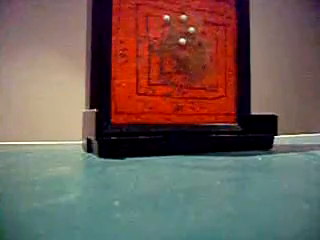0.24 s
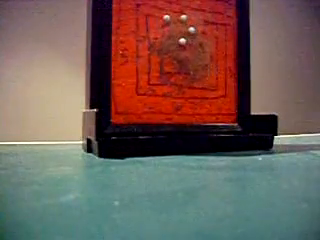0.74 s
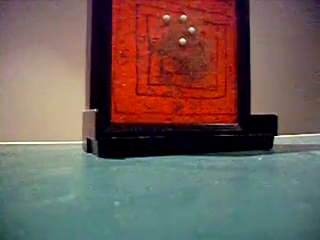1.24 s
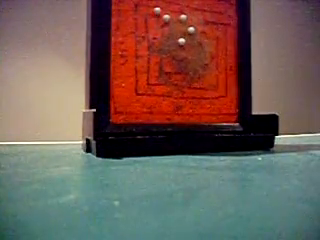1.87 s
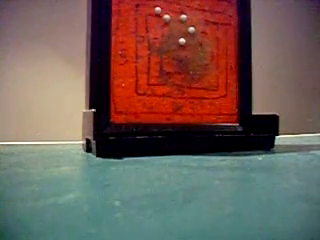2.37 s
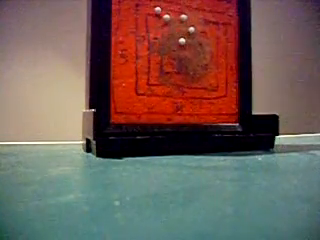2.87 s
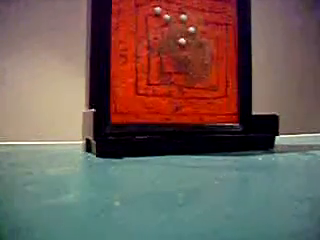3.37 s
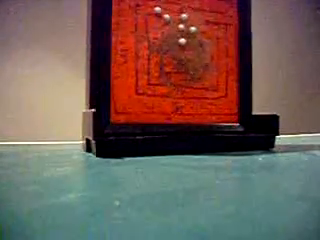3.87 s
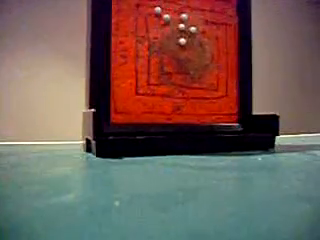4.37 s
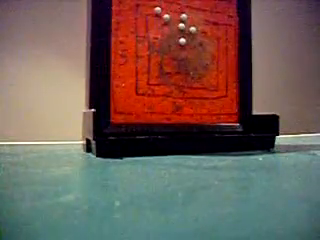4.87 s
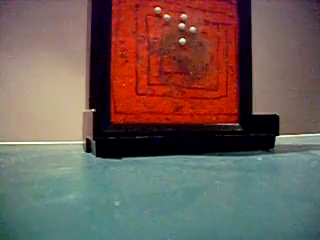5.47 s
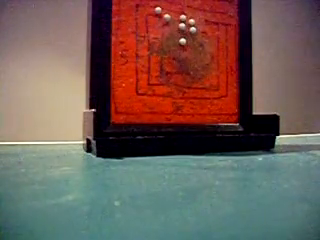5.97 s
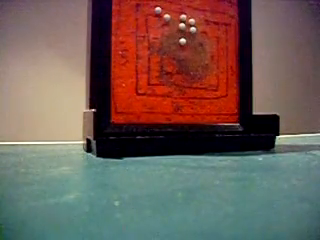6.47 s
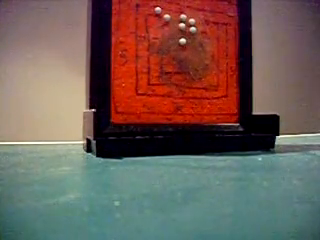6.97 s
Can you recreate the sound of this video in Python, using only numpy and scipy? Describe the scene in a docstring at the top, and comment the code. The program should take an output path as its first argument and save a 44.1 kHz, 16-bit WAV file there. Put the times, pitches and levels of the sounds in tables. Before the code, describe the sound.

Four loud airsoft snaps with pellets smacking plastic indoors, each followed by the clicks and clack of the slide being cocked.

```python
"""Airsoft target practice in a hard room

A spring airsoft pistol fires four times at a sticky plastic target close to the microphone. Each shot
is a piston slam, the pellet's smack on the drumming panel, then a dull thud. The slide is racked back
with small clicks and scrapes, and snaps home. The loud blows overload the microphone stage."""
import sys
import numpy as np
from scipy import signal
from scipy.fft import rfft, irfft
from scipy.io import wavfile
from scipy.ndimage import uniform_filter1d

SR = 44100
rng = np.random.default_rng(int(sys.argv[2]) if len(sys.argv) > 2 else 0)


def digitize_waveform(pressure):
    """Quantize a signal to 16-bit integers and store it at the path in sys.argv[1].

    Rows of a 2-D input are taken as channels; values are limited to [-1, 1].
    """
    field = np.atleast_2d(pressure).T
    bounded = np.clip(field, -1, 1)
    quanta = np.round(bounded * 32767).astype(np.int16)
    wavfile.write(sys.argv[1], SR, quanta)


N = 318402

# Piston slams. Each row: start in seconds, level in dB, crack in dB, wait for the thud in seconds.
SHOTS = [(0.0321, 1, -25, .1097), (2.0662, 0.5, -6.5, 0.11), (4.0226, 1, -5.5, .1068),
         (5.9307, -1.5, -5, 0.11)]
# The slide snapping home. Each row: impact time in seconds, level in dB, spring ring in dB,
# travel time since letting go in seconds, click of letting go in dB.
SLIDE_SNAPS = [(0.8585, -3.5, -42, 0.017, -6.5), (2.8530, -2.5, -52, 0.011, -2.5),
               (4.8388, -5.5, -37, 0.018, 1.5), (6.746, -3.5, -39, .0155, 1)]
# Tone of a smack on plastic, a bright tick and a knock on the pistol's body.
# Each row: frequency in Hz, relative level in dB.
SMACK_TONE = [(25, -12), (200, -3.5), (310, -6), (520, 4.5), (680, 3), (950, 7), (1270, -7), (1700, 4),
              (2500, -10.5), (3400, -1.5), (5000, -18), (7400, -31)]
TICK_TONE = [(200, -14), (1200, -23), (2000, -5.5), (2800, -6), (3200, 2.5), (3900, -3), (4900, -2),
             (5700, -0.5), (6050, 3.5), (6300, 0), (6650, 5.5), (7200, -8.5), (7500, 5)]
KNOCK_TONE = [(100, -23), (500, -9), (1000, -7), (1350, -15.5), (1600, 4.5), (1900, 5.5), (2200, -11),
              (2600, -2), (4000, -31), (7500, -36)]
# Modes of the pistol's shell. Each row: frequency in Hz, level in dB, time to fade 60 dB in seconds.
SHELL_MODES = [(1587, -7, 0.066), (1774, -1, .05), (1922, 1.5, 0.048), (2290, 2, .045), (3250, -4, 0.12),
               (6000, 1.5, 0.036), (6720, 5.5, 0.025)]


def amp(db):
    """Decibels to gain."""
    return 10 ** (np.asarray(db) / 20)


def unit_rms(x):
    """Scales a signal to an rms of 1."""
    return x / np.sqrt(np.mean(x ** 2) + 1e-20)


def curve_at(points, hz):
    """Joins table points on a log-frequency axis."""
    freqs, values = np.transpose(points)
    return np.interp(np.log(hz + 1), np.log(freqs + 1), values)


def add(mix, start_s, sound):
    """Mixes a sound in at its start time."""
    start = round(start_s * SR)
    sound = sound[max(-start, 0):]
    part = mix[max(start, 0):][:len(sound)]
    part += sound[:len(part)]


def colour(x, tone, size=4096):
    """Minimum-phase EQ with extra roll-off above 8 kHz; white noise keeps its power."""
    hz = abs(np.fft.fftfreq(size, 1 / SR))
    rolloff_db = 20 * np.clip(hz / 8000 - 1, 0, 2)
    log_gain = np.log(amp(curve_at(tone, hz) - rolloff_db))
    taps = np.fft.ifft(np.exp(np.conj(signal.hilbert(log_gain)))).real
    return signal.oaconvolve(x, taps / np.linalg.norm(taps))[:N]


def chatter(envelope):
    """Dense micro-impacts under an envelope, about equally strong at every frequency."""
    x = envelope * rng.standard_normal(len(envelope))
    for _ in range(3):
        white = irfft(np.exp(1j * np.angle(rfft(x))), len(x))
        local_rms = np.sqrt(abs(uniform_filter1d(white ** 2, 64)) + 1e-18)
        x = envelope * white / local_rms
    return x


def blows(rows, decay_s, lead_s, lead_db):
    """Each blow (seconds, dB) swells as the parts slide together, strikes and dies away."""
    out, t = np.zeros(N), np.arange(4096) / SR
    run_up = amp(lead_db) * np.maximum(1 - t[::-1] / lead_s, 0) ** 2
    for start, db in rows:
        add(out, start - t[-1], amp(db) * run_up * rng.standard_normal(len(t)))
        add(out, start, amp(db) * chatter(np.exp(-t / decay_s)))
    return out


def ring(rows, modes, detune=0.0056):
    """Each blow (seconds, dB) sets the same damped modes going, slightly detuned by where it lands."""
    out, t = np.zeros(N), np.arange(SR // 2) / SR
    for start, blow_db in rows:
        for hz, db, t60 in modes:
            cycles = hz * (1 + detune * (2 * rng.random() - 1)) * t + rng.random()
            add(out, start, amp(blow_db + db - 60 * t / t60) * np.sin(2 * np.pi * cycles))
    return out


def room_tail(build_s=0.0086, mixing_s=0.11):
    """Separate echoes crowd into a wash; each band dies at its own speed."""
    # Room decay. Each row: frequency in Hz, time to fade 60 dB in seconds.
    reverb_times = [(60, 0.38), (170, 0.48), (450, 0.47), (1000, 0.47), (1800, 0.52), (2600, 0.41),
                    (3400, 0.56), (5000, 0.46), (7500, 0.36)]
    age = np.arange(SR) / SR
    density = np.clip((age / mixing_s) ** 2, 0.03, 1) / 10  # echoes per sample
    arrivals = np.diff(np.floor(np.cumsum(density * 2 * rng.random(SR))), prepend=0)
    echoes = arrivals * rng.choice([-1., 1.], SR) / np.sqrt(density)
    hz, t, bands = signal.stft(echoes, SR, nperseg=256)
    fade = amp(-60 * t / curve_at(reverb_times, hz)[:, None])
    tail = signal.istft(bands * fade, SR, nperseg=256)[1][:SR]
    tail *= 1 - np.exp(-(age / build_s) ** 2)
    return tail / np.linalg.norm(tail)


def in_room(x, early, wet_db):
    """Direct sound, early reflections and the tail for one spot in the room."""
    # Bounces off near surfaces. Each row: delay in seconds, relative gain.
    reflections = [(.0052, 0.32), (.0098, 0.24), (0.0121, 0.36), (0.0258, 0.26), (0.032, 0.3),
                   (0.0344, 0.14)]
    response = amp(wet_db) * room_tail()
    response[0] += 1
    for delay, gain in reflections:
        add(response, delay, np.array([early * gain]))
    return signal.oaconvolve(x, response)[:N]


def room_tone(level_db=-50.5):
    """A steady bed of room rumble and microphone hiss."""
    # Tone of the bed. Each row: frequency in Hz, relative level in dB.
    bed_tone = [(12, -26), (20, 3), (80, -6), (200, -9.5), (269, -10), (344, -11.5), (705, -15.5),
                (798, -16.5), (1100, -18), (1680, -20.5), (1850, -20), (3350, -23), (7400, -23),
                (9620, -56), (16300, -120)]
    gain = amp(curve_at(bed_tone, np.fft.rfftfreq(N, 1 / SR)))
    return amp(level_db) * unit_rms(irfft(rfft(rng.standard_normal(N)) * gain, N))


def piston_slams():
    """The spring drives the piston into the cylinder head with a crack, and the shell rings."""
    # Tone of the slam. Each row: frequency in Hz, relative level in dB.
    slam_tone = [(25, -7.5), (100, -8), (250, -2), (430, 3), (640, -7), (850, 3.5), (1200, -3.5),
                 (1400, -0.5), (2100, -4.5), (2500, -1), (3500, -4), (4800, -8), (7400, -21.5)]
    shots = np.array(SHOTS)
    slam = colour(blows(shots[:, :2], decay_s=0.0049, lead_s=0.0095, lead_db=-14.5), slam_tone)
    crack = colour(blows(shots[:, [0, 2]], decay_s=0.0039, lead_s=0.00092, lead_db=-19), TICK_TONE)
    shell = amp(-23) * ring(shots[:, :2], SHELL_MODES)
    return in_room(slam + crack + shell, early=0.84, wet_db=-1.5)


def pellet_hits():
    """A pellet cracks onto the panel, which drums (higher near its rim); a hard hit rattles the frame."""
    # Pellets landing. Each row: start in seconds, smack in dB, drum note in dB, its ring-time factor,
    # its pitch factor, frame rattle in dB, crack in dB.
    hits = [(.057, 3, 2, 0.68, 1.04, -31, -4), (2.092, 3.5, -4, 0.59, 1.42, -22.5, -1.5),
            (4.0448, 5, 9, 1.01, 1.04, 0.5, -4.5), (5.956, -17.5, 6, 0.33, 0.945, -40, -16.5)]
    # Drum modes of the panel. Each row: frequency in Hz, level in dB, time to fade 60 dB in seconds.
    panel_modes = [(512.6, -12, 0.069), (620.4, -4.5, 0.084), (681, -2, 0.07), (755.5, -6, 0.099),
                   (840, -10.5, 0.09), (961, -8.5, 0.055), (1660, -29, 0.18)]
    hits = np.array(hits)
    smack = colour(blows(hits[:, :2], decay_s=0.0043, lead_s=0.00161, lead_db=-10), SMACK_TONE)
    crack = colour(blows(hits[:, [0, 6]], decay_s=0.0016, lead_s=0.001, lead_db=-20), TICK_TONE)
    rattle = colour(blows(hits[:, [0, 5]], decay_s=0.022, lead_s=0.002, lead_db=-24), TICK_TONE)
    drum = sum(ring([(start, db)], np.array(panel_modes) * [pitch, 1, stretch])
               for start, _, db, stretch, pitch, _, _ in hits)
    return (in_room(smack + crack, early=0.72, wet_db=-10.5)
            + in_room(drum, early=0.15, wet_db=-8)
            + in_room(rattle, early=0.38, wet_db=-4))


def dull_thuds():
    """After each shot a single low push booms in the room, with a light, dry tick on top."""
    # Tone of the thud. Each row: frequency in Hz, relative level in dB.
    thud_tone = [(20, -2.5), (60, 2.5), (125, 1), (200, -5), (400, -16), (1500, -21.5), (7000, -38.5)]
    thuds = [(start + delay, -5.5) for start, _, _, delay in SHOTS]  # seconds, dB
    push = np.zeros(N)
    for start, db in thuds:
        add(push, start, -amp(db) * np.ones(3))
    tick = amp(-10) * colour(blows(thuds, decay_s=0.0015, lead_s=0.001, lead_db=-19), SMACK_TONE)
    return in_room(colour(push, thud_tone), early=0.8, wet_db=-0.5) + tick


def slide_clicks():
    """Cue list of the racking clicks. Each row: start in seconds, knock in dB, tick in dB."""
    # Pulls of the slide. Each row: start in seconds, take-up trim in dB, stroke time in seconds,
    # rear-stop trim in dB, pause before a faint click in seconds, that click's trim in dB.
    pulls = [(.6040, 1, .0760, 0.5, 0.1, 3), (2.6391, 2.5, 0.056, 3.5, 0.098, -1),
             (4.5910, 1, .0660, 0.5, .088, -4), (6.5040, 1, 0.07, -1, 0.095, 0)]
    # The slide takes up its play, meets the piston and ticks over a catch.
    # Each row: seconds into the pull, body knock in dB, metal tick in dB.
    take_up = [(0, -31.5, -65.5), (0.0172, -29, -26.5), (.0310, -36, -27.5)]
    # The sear latches and the slide knocks. Each row: seconds after the stop, knock in dB, tick in dB.
    rear_stop = [(0, -35, -25.5), (.0035, -23.5, -26)]
    clicks = []
    for start, pull_db, stroke, stop_db, pause, faint_db in pulls:
        stop = start + stroke
        clicks.append(np.array(take_up) + [start, pull_db, pull_db])
        clicks.append(np.array(rear_stop) + [stop, stop_db, stop_db])
        clicks.append([stop + pause, faint_db - 37.5, faint_db - 36.5])  # probably a pellet feeding
    for home, _, _, travel, release_db in SLIDE_SNAPS:
        clicks.append([home - travel, release_db - 35.5, release_db - 34])  # letting go
    return np.vstack(clicks)


def slide_racking():
    """The slide is pulled back against its spring, clicking and scraping."""
    clicks = slide_clicks()
    knocks = colour(blows(clicks[:, :2], decay_s=0.0036, lead_s=0.021, lead_db=-7.5), KNOCK_TONE)
    ticks = colour(blows(clicks[:, [0, 2]], decay_s=0.004, lead_s=0.006, lead_db=-2.5), TICK_TONE)
    shell = amp(-15) * ring(clicks[:, :2], SHELL_MODES)
    return in_room(knocks + ticks + shell + rail_scrape(clicks), early=0.11, wet_db=-5)


def rail_scrape(clicks, rise_s=0.0076, grain_db=4):
    """After each click the slide drags on its rails in uneven grains."""
    # Tone of the rubbing rails. Each row: frequency in Hz, relative level in dB.
    rail_tone = [(200, -17), (1000, -9), (1800, 5.5), (2600, 5), (3600, 5.5), (4900, -3), (5600, 2.5),
                 (6020, 3), (6300, -13), (6650, -1.5), (7400, -7.5)]
    pressure, t = np.zeros(N), np.arange(SR // 10) / SR
    for start, _, tick_db in clicks:
        add(pressure, start, amp(tick_db) * t / rise_s * np.exp(1 - t / rise_s))
    grains = amp(grain_db * unit_rms(uniform_filter1d(rng.standard_normal(N), size=90)))
    friction = unit_rms(grains * rng.standard_normal(N))
    return amp(-9) * colour(pressure * friction, rail_tone)


def slide_snaps():
    """Let go, the slide runs forward on its rails and clacks home; the return spring rings on."""
    # Tone of the snap. Each row: frequency in Hz, relative level in dB.
    snap_tone = [(60, -25), (200, -22.5), (380, -14.5), (560, -6), (720, -20.5), (950, -1), (1120, -4.5),
                 (1300, -7.5), (1650, -3.5), (1930, 0.5), (2700, -6.5), (3400, -1), (5200, -6), (7400, -7)]
    # Return spring modes. Each row: frequency in Hz, level in dB, time to fade 60 dB in seconds.
    spring_modes = [(1800, -1, 0.75), (1935, 0.5, 0.67), (1800, -9, .45)]
    snaps = np.array(SLIDE_SNAPS)
    impacts = snaps[:, :2]
    snap = colour(blows(impacts, decay_s=0.0034, lead_s=0.018, lead_db=-12.5), snap_tone)
    clack = amp(-2) * colour(blows(impacts, decay_s=0.0021, lead_s=0.0029, lead_db=-2.5), KNOCK_TONE)
    shell = amp(-18) * ring(impacts, SHELL_MODES)
    body = in_room(clack + shell, early=0.41, wet_db=-7.5)
    return in_room(snap, early=0.42, wet_db=-3.5) + body + ring(snaps[:, [0, 2]], spring_modes)


def scene():
    """Shots, slide action and room tone in a mono mix."""
    return (piston_slams() + pellet_hits() + dull_thuds() + slide_racking() + slide_snaps()
            + room_tone())[None]


def record(dry, headroom=0.75, ceiling=0.73, cutoff_hz=15900):
    """The microphone stage overloads, the band narrows, and the output clips again before a low-pass."""
    # A narrow band with a faint leak above it. Each row: frequency in Hz, gain in dB.
    passband = [(0, 0), (7450, 0), (7750, -45), (8350, -48), (8650, -24), (9000, -28), (9500, -65),
                (22050, -90)]
    hz, db = np.transpose(passband)
    band_gain = amp(np.interp(np.fft.rfftfreq(N, 1 / SR), hz, db))
    overloaded = np.clip(dry, -headroom, headroom)
    narrow = irfft(rfft(overloaded) * band_gain, N)
    clipped = np.clip(narrow, -ceiling, ceiling)
    low_pass = signal.firwin(511, cutoff_hz, window=("kaiser", 9), fs=SR)
    return signal.oaconvolve(clipped, low_pass[None], "same")


dry = scene()
out = record(dry)
digitize_waveform(out)
```